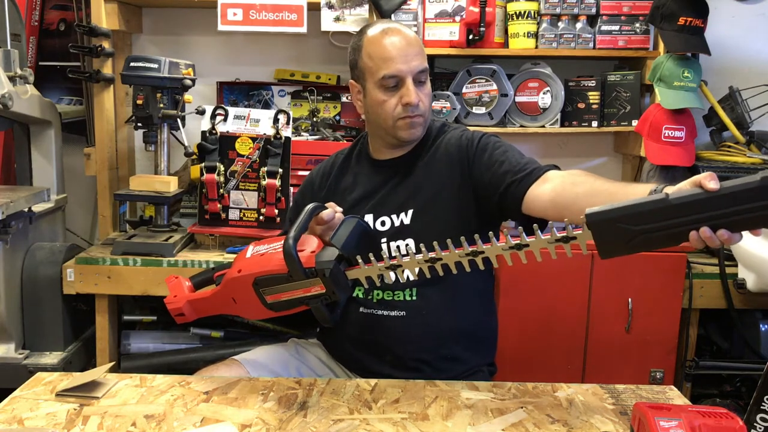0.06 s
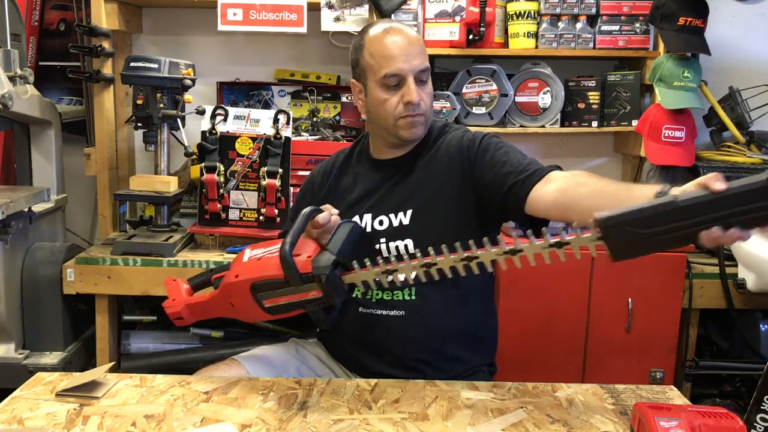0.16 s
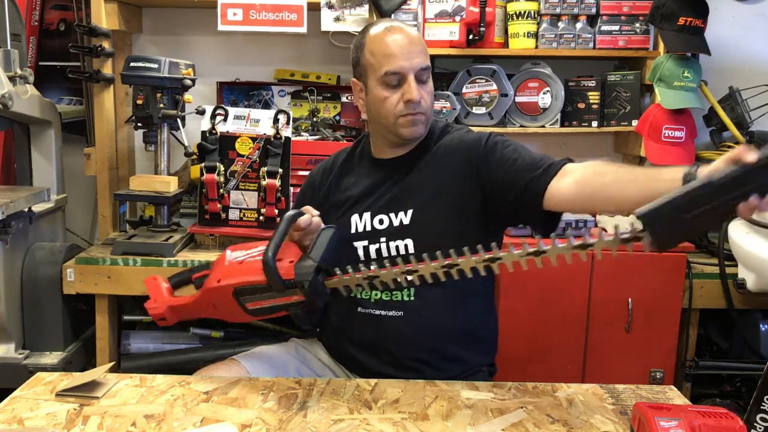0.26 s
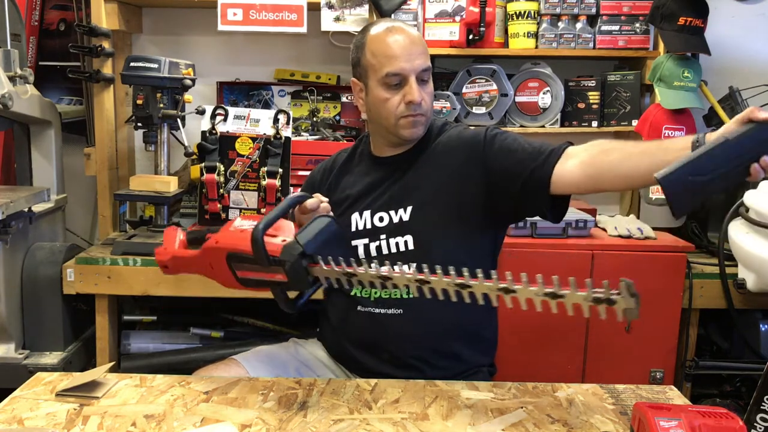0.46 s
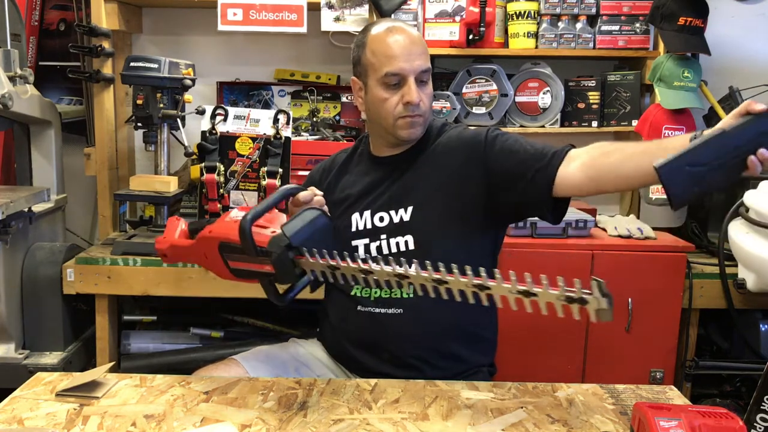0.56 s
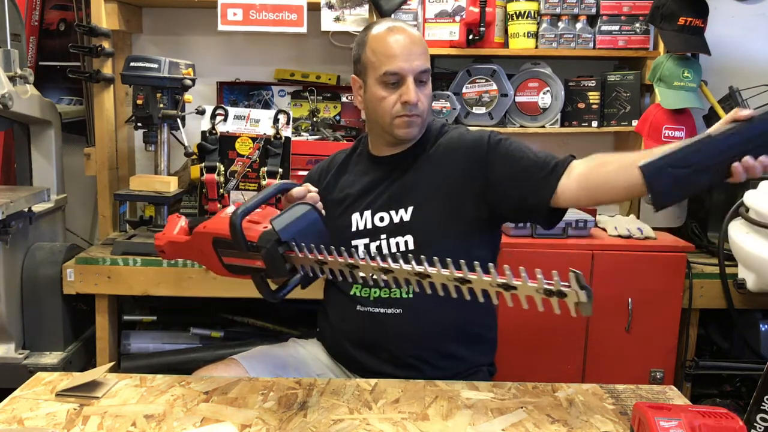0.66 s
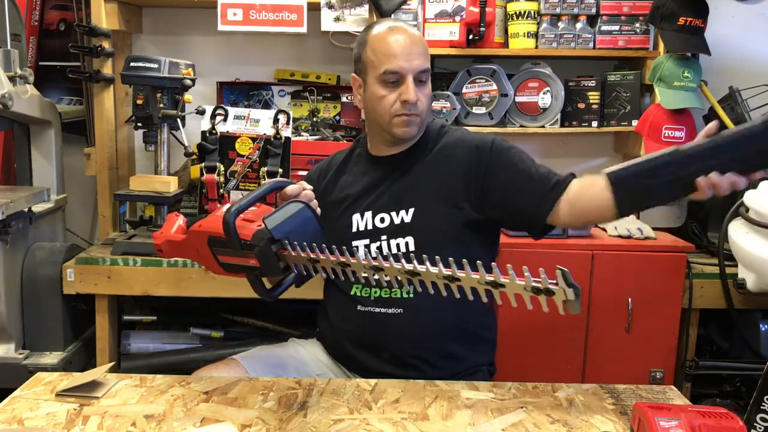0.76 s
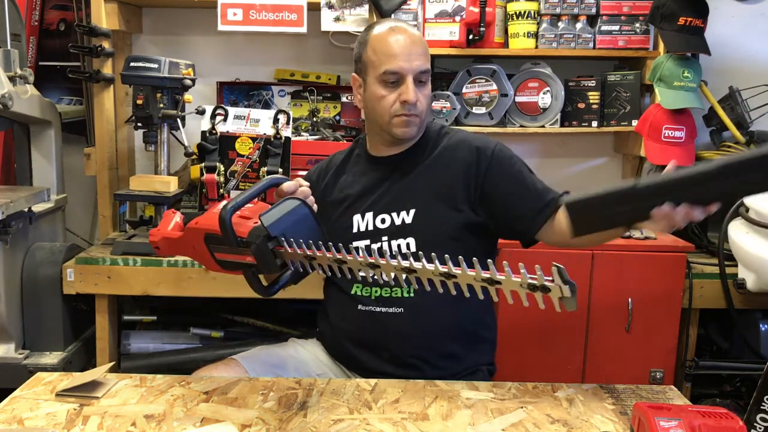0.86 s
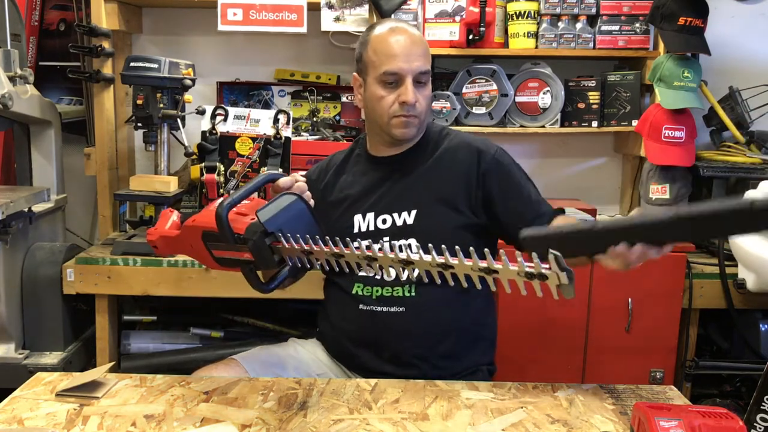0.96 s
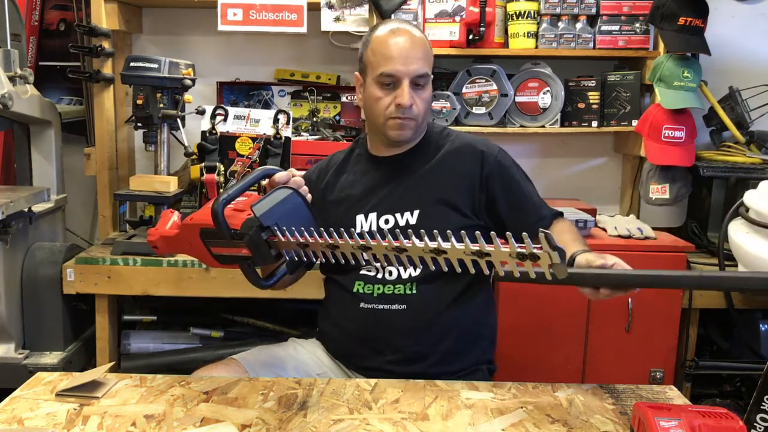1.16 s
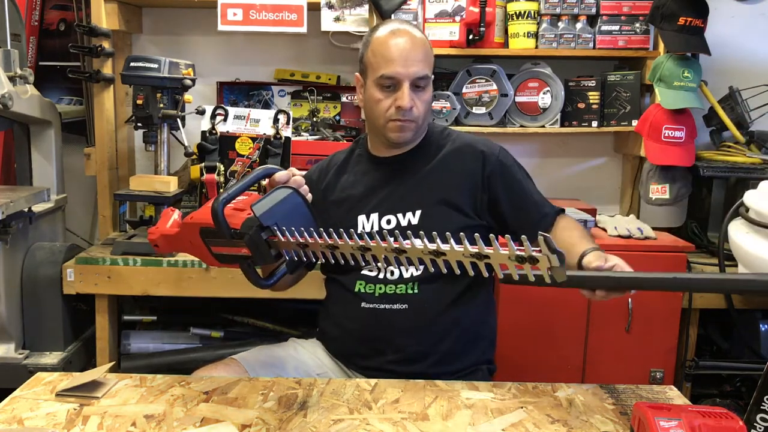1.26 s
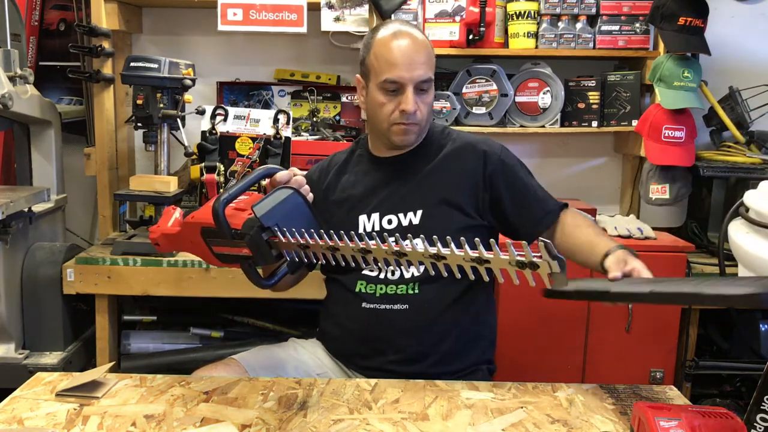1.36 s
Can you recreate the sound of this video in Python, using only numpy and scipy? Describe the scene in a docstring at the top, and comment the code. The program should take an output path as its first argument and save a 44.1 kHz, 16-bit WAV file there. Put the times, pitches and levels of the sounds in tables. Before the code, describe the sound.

A hard plastic sheath is pulled off a hedge trimmer's steel blade in a quick, rattling scrape. The blade hums faintly, then the sheath knocks once and clatters lightly onto a wooden bench, close by in a garage.

```python
"""A hard plastic sheath is pulled off a hedge trimmer's steel blade, close to one microphone in a garage.
It squeaks, scrapes and snags on the teeth, and each snag rings the hollow plastic and pushes the
blade, which hums on once it is free. The sheath then slips through the hand, knocks once, and drags
and clatters down onto a wooden bench. Behind it lie a short room tail and faint, steady air."""
import sys
import numpy as np
from scipy import signal
from scipy.fft import rfft, irfft
from scipy.io import wavfile

SR = 44100
rng = np.random.default_rng(int(sys.argv[2]) if len(sys.argv) > 2 else 0)


def wav_out(sig):
    """Save sig, one row per channel (or a flat mono array), as 16-bit PCM at SR to the path in sys.argv[1]."""
    wavfile.write(sys.argv[1], SR, np.round(np.clip(np.atleast_2d(sig).T, -1, 1) * 32767).astype(np.int16))


N = 61739

# teeth catching the sheath; levels are relative, here and in the tables below:
# (time [s], hollow body [dB], wall clack [dB], crack [dB], fine snap [dB], push on the blade [dB])
CATCHES = [(.1763, -87, -36.5, -27.5, -48, -23), (.1995, -27, -30, -16, -31, -4),
           (0.2053, -6, -9.5, -11, -23, -21), (0.2121, -8.5, -6, -21, -29, -21),
           (0.2166, -13, -7, -21.5, -26.5, -22.5), (0.2216, -9.5, -11, -16, -22.5, -15),
           (.2245, -10.5, -6, -7, -20, -16.5), (.2300, -13.5, -13, -9.5, -10.5, -17),
           (0.2346, -4, -14, -11, -26, -13), (.2415, -8, -13, -14, -19.5, -1.5),
           (.2510, -14, -12.5, -14, -32, -18), (.2661, -6.5, -7, -3.5, -2.5, 4),
           (0.2763, -9, -16.5, -10.5, -16, -21.5), (0.285, -7, -8.5, -8, -17, -24),
           (0.2877, -8, -7.5, -13, -19, -13), (0.2926, -1.5, -8.5, -10.5, -29.5, 1.5),
           (.3050, -16, -20, -18.5, -27.5, -25), (0.3179, -6.5, -28, -9, -22, -14.5),
           (.3240, -19.5, -15, -7.5, -23, -20), (.3280, -6.5, -28, -17, -33, -16.5),
           (.3310, -34, -26, -16.5, -34, -14), (0.342, -19, -12, -28, -35, -24)]
# modes of the hollow sheath: (frequency [Hz], level [dB], t60 [s])
SHEATH_MODES = [(260, -9.5, 0.097), (348, -10.5, 0.15), (402.4, -7.5, 0.1), (443, -3, 0.2),
                (504, 1.5, 0.11), (553, 1.5, 0.099), (745, -7.5, 0.096), (764.6, -10, 0.091),
                (865, -14.5, 0.02), (1009, -8, 0.053), (1030, -15.5, 0.032), (1070, -15, 0.033),
                (1290, -10, 0.058), (1578, -12, 0.16), (1916, -16, 0.077)]
# modes of its flat walls: (frequency [Hz], level [dB], t60 [s])
WALL_MODES = [(722, 0, .07), (800, -4, .05), (970, 2.5, 0.076), (1068, -6, 0.044), (1119, -4.5, 0.044),
              (1231, -3.5, .05)]
# modes of the steel teeth, deadened by the plastic: (frequency [Hz], level [dB], t60 [s])
TEETH_MODES = [(1650, -3, .045), (1900, -5, 0.035), (2200, -5.5, .045), (2428, -3.5, 0.061),
               (3197, 3.5, 0.027), (4640, 0, 0.026), (5155, 0, 0.056), (5700, -2, 0.09), (7290, 1, 0.02)]
# crack of hard plastic: (frequency [Hz], level [dB])
CRACK_SPECTRUM = [(40, -7), (190, -30.5), (400, -0.5), (1100, -1), (1430, -4.5), (1750, 4), (2600, -2.5),
                  (3250, -1.5), (3900, -1), (5200, -1.5), (6600, -16.5), (9000, -26.5), (12500, -30),
                  (16000, -50.5)]
# the fine, bright snap on top of it: (frequency [Hz], level [dB])
SNAP_SPECTRUM = [(100, -44), (3000, -12), (5500, 8), (7500, 2), (11000, -11.5), (14000, -16.5),
                 (16000, -18.5)]


def snagging():
    """Close to the microphone, tooth after tooth catches the sheath and rings plastic and steel."""
    times, body_db, clack_db, crack_db, snap_db, _ = np.transpose(CATCHES)
    crack_force = contacts(times, crack_db, chatter_share=1, chatter_s=0.0052)
    body = through(contacts(times, body_db, chatter_share=0.088), ring(SHEATH_MODES))
    cracks = through(crack_force, colour(CRACK_SPECTRUM))
    teeth = amp(-8) * through(crack_force, ring(TEETH_MODES))
    snaps = through(contacts(times, snap_db, chatter_share=1, chatter_s=0.0013), colour(SNAP_SPECTRUM))
    walls = amp(-2.5) * through(contacts(times, clack_db, chatter_share=0.3), ring(WALL_MODES))
    return amp(2.5) * (body + cracks + teeth + snaps + walls)


# sliding pressure on the blade: (time [s], level [dB])
SLIDE_LEVEL = [(0, -73), (.035, -71.5), (.068, -59.5), (.105, -74), (.135, -62), (.155, -63.5),
               (.18, -50.5), (.195, -45), (.206, -31.5), (.235, -30), (.258, -34), (.29, -29), (.31, -36.5),
               (.33, -39), (.35, -41), (.38, -82)]
# plastic scraping on steel: (frequency [Hz], level [dB])
SCRAPE_SPECTRUM = [(40, -6.5), (110, -2.5), (190, -18), (350, 5.5), (500, 0.5), (640, -22), (740, 2),
                   (850, -1), (1020, -1.5), (1250, -3.5), (1430, -7), (1800, -3.5), (3800, -8),
                   (5300, -6.5), (7000, -14.5), (11500, -22), (16000, -43.5)]
# plastic squeaking on steel: (time [s], level [dB])
SQUEAK_LEVEL = [(.03, -80.5), (.06, -68.5), (.095, -85), (.118, -69), (.135, -52), (.15, -66.5),
                (.17, -79.5)]


def scraping(squeak_hz=1050, squeak_t60_s=0.075):
    """Tiny slips along the blade rasp, ring the hollow sheath and excite one squeaking mode."""
    grain = friction(slips_per_s=3500, spread_db=3.5)
    slips = grain * level(SLIDE_LEVEL)
    rasp = through(slips, colour(SCRAPE_SPECTRUM))
    body = amp(-1) * through(slips, ring(SHEATH_MODES))
    squeak = through(grain * level(SQUEAK_LEVEL), ring([(squeak_hz, 0, squeak_t60_s)]))
    return rasp + body + squeak


# modes of the steel blade: (frequency [Hz], level [dB], t60 [s], gain while sheathed [0-1])
BLADE_MODES = [(103.7, -31.5, 0.81, 1), (445.7, -29.5, 0.28, 0.091), (481.8, -28, 0.2, .1),
               (730, -58.5, 0.28, 0.3), (987, -59, 0.38, 0.24), (1308, -50.5, 0.44, .3),
               (1590, -54.5, .28, .3)]


def blade_hum(flex_s=0.019, freed_at_s=0.37, freeing_s=0.13):
    """Every snag slowly flexes the blade and feeds its modes, which ring out once it is free."""
    t = np.arange(N) / SR
    pushes, hum = np.zeros(N), np.zeros(N)
    flex = unit(np.hanning(round(flex_s * SR)))
    for s, *_, push_db in CATCHES:
        add(pushes, s - flex_s / 2, (amp(push_db) * flex) ** 2)
    pushes[0] += amp(-24) ** 2  # the blade is already humming faintly
    freedom = np.clip(1 + (t - freed_at_s) / freeing_s, 0, 1)
    for hz, db, t60, sheathed in BLADE_MODES:
        energy_kept = amp(-120 / (t60 * SR))  # per sample
        energy = signal.lfilter([1], [1, -energy_kept], pushes)
        exposure = sheathed + (1 - sheathed) * freedom
        hum += amp(db) * exposure * np.sqrt(2 * energy) * np.sin(2 * np.pi * hz * t)
    return hum


# the sheath's knocks against hand and bench, with two quick echoes of the loudest:
# (time [s], hollow tock [dB], clack [dB], crack [dB])
KNOCKS = [(0.725, -61, -29, -41), (.7310, -66, -32.5, -34), (.7760, -52, -52, -31),
          (0.9568, -11.5, -21.5, -42), (0.963, -13.5, -25, -54), (0.9734, -18, -34.5, -63),
          (0.9867, -32.5, -33, -63), (1.3645, -25, -42, -48), (1.381, -31, -22.5, -30),
          (1.3842, -35, -26, -39), (1.3902, -28, -25.5, -37), (1.3950, -34, -22, -32)]
# modes of the sheath's end striking wood: (frequency [Hz], level [dB], t60 [s])
TOCK_MODES = [(289, -9, 0.062), (415, -2.5, 0.13), (527, 8, 0.039), (740, -2.5, 0.076), (988, -18, 0.056),
              (1271, -15, 0.18), (1570, -24, 0.34), (1630, -15, .03), (1883, -34, 0.019), (5230, -11, .028)]
# dull clack of the sheath: (frequency [Hz], level [dB])
CLACK_SPECTRUM = [(60, -36), (200, -44), (520, -4), (760, 0), (900, -4), (1250, -1), (1900, -14),
                  (2500, -18.5), (5300, -24.5), (14000, -47)]


def knocking():
    """The empty sheath knocks as it is lowered and set down on the bench near the microphone."""
    times, tock_db, clack_db, crack_db = np.transpose(KNOCKS)
    tocks = through(contacts(times, tock_db, chatter_share=0.013), ring(TOCK_MODES))
    clacks = through(contacts(times, clack_db, chatter_share=0.8), colour(CLACK_SPECTRUM))
    cracks = through(contacts(times, crack_db, chatter_share=0.99), colour(CRACK_SPECTRUM))
    return amp(1) * (tocks + clacks + cracks)


# the hand rubbing along the sheath: (time [s], level [dB])
RUB_LEVEL = [(.70, -79), (.758, -68), (.775, -52.5), (.81, -59.5), (.865, -60), (.905, -56), (.95, -63.5),
             (1.0, -63), (1.05, -62), (1.10, -74.5), (1.16, -85.5), (1.21, -75), (1.28, -88), (1.32, -67.5),
             (1.35, -58.5), (1.4, -66)]
# skin on plastic: (frequency [Hz], level [dB])
SKIN_SPECTRUM = [(60, -37), (200, 4), (480, -3.5), (660, -8), (800, -6.5), (1800, -3), (3500, -3),
                 (5500, -2.5), (7500, -9.5), (12000, -15), (16000, -27)]


def rubbing():
    """The sheath slips through the hand: a soft, close hiss that also rings its hollow body."""
    slips = friction(slips_per_s=9000, spread_db=3) * level(RUB_LEVEL)
    return through(slips, colour(SKIN_SPECTRUM)) + amp(-1.5) * through(slips, ring(SHEATH_MODES))


# the sheath's end dragging over the bench: (time [s], level [dB])
DRAG_LEVEL = [(1.29, -91.5), (1.318, -62), (1.329, -49), (1.345, -57), (1.37, -55.5), (1.4, -46.5)]
# plastic on wood: (frequency [Hz], level [dB])
BENCH_SPECTRUM = [(60, -24.5), (280, -7), (400, -2), (540, -1), (650, -2), (770, 13.5), (900, -14),
                  (1020, 0), (1220, -2), (1600, -22), (3000, -22.5), (12000, -43)]


def dragging():
    """At the bench, the sheath's end slides briefly over the wood in tiny slips."""
    slips = friction(slips_per_s=9000, spread_db=3) * level(DRAG_LEVEL)
    return through(slips, colour(BENCH_SPECTRUM))


# decay of the garage: (frequency [Hz], t60 [s])
GARAGE_T60 = [(100, 0.1), (500, 0.39), (1500, .42), (5000, 0.44), (9000, 0.38), (15000, 0.35)]


def garage(direct, wet_db):
    """The direct sound reaches the microphone first, then a diffuse tail dying band by band."""
    t = np.arange(SR // 2) / SR
    reflections = rng.standard_normal(len(t)) * np.clip((t - 0.003) / 0.0035, 0, 1)
    hz, s, bands = signal.stft(reflections, SR, nperseg=256)
    decay = amp(-60 * s / read(GARAGE_T60, hz)[:, None])
    tail = signal.istft(bands * decay, SR, nperseg=256)[1]
    return direct + amp(wet_db) * through(direct, unit(tail))


# room tone of the garage: (frequency [Hz], level [dB])
AIR_SPECTRUM = [(12, -37), (20, -1), (86, -2), (182, -10.5), (446, -15), (849, -22.5), (949, -23.5),
                (1220, -25), (5850, -35), (14700, -39.5), (16000, -39)]


def air(rms_db=-62):
    """Faint, steady, low noise all around the microphone."""
    gain = amp(read(AIR_SPECTRUM, np.fft.rfftfreq(N, 1 / SR)))
    noise = irfft(rfft(rng.standard_normal(N)) * gain, N)
    return amp(rms_db) * unit(noise) * np.sqrt(N)


def contacts(times, dbs, chatter_share, chatter_s=0.0073, size=2048):
    """Force of contacts, each one's energy split between a sharp click and a dying chatter."""
    force, t = np.zeros(N), np.arange(size) / SR
    for s, db in zip(times, dbs):
        blow = np.sqrt(chatter_share) * unit(rng.standard_normal(size) * np.exp(-t / chatter_s))
        blow[0] -= np.sqrt(1 - chatter_share)  # the click
        add(force, s, amp(db) * blow)
    return force


def friction(slips_per_s, spread_db):
    """Random tiny slips of uneven size, rms 1."""
    sizes = amp(spread_db * np.minimum(rng.exponential(1, N), 4)) * rng.choice([-1, 1], N)
    slipping = rng.random(N) < slips_per_s / SR
    return unit(sizes * slipping) * np.sqrt(N)


def ring(modes, bass_cut_hz=286):
    """The dying modes of a struck object, with the bass filtered out."""
    t = np.arange(SR // 3) / SR
    ringing = sum(amp(db - 60 * t / t60) * np.sin(2 * np.pi * hz * t) for hz, db, t60 in modes)
    return unit(signal.sosfilt(signal.butter(4, bass_cut_hz, "high", fs=SR, output="sos"), ringing))


def colour(spectrum, size=4096):
    """Causal impulse response with the given spectral shape."""
    log_gain = np.log(amp(read(spectrum, abs(np.fft.fftfreq(size, 1 / SR)))))
    minimum_phase = np.exp(np.conj(signal.hilbert(log_gain)))
    return unit(np.fft.ifft(minimum_phase).real[:size // 2])


def amp(db):
    """Decibels to gain."""
    return 10 ** (np.asarray(db) / 20)


def read(points, hz):
    """Interpolates a table on a log-frequency axis."""
    table_hz, values = np.transpose(points)
    return np.interp(np.log(hz + 1), np.log(table_hz + 1), values)


def level(points):
    """A level curve as gain per sample, silent outside its span."""
    s, db = np.transpose(points)
    return amp(np.interp(np.arange(N) / SR, s, db, left=-200, right=-200))


def unit(x):
    """Scales to energy 1."""
    return x / (np.linalg.norm(x) + 1e-20)


def add(mix, s, sound):
    """Mixes a sound in at a time."""
    part = mix[max(round(s * SR), 0):][:len(sound)]
    part += sound[:len(part)]


def through(x, response):
    """Passes a sound through an impulse response."""
    return signal.fftconvolve(x, response)[:N]


def scene():
    """One microphone, close enough that the direct sound stands well above the garage's tail."""
    pull = garage(snagging() + scraping(), wet_db=-10)
    handling = garage(rubbing() + dragging(), wet_db=-10)
    knocks = garage(knocking(), wet_db=-10.5)
    return (pull + blade_hum() + handling + knocks + air())[None]


def record(dry):
    """The recorder passes the microphone's signal up to 15.9 kHz."""
    lowpass = signal.firwin(401, 15900, window=("kaiser", 9), fs=SR)
    return signal.oaconvolve(dry, lowpass[None], "same")


dry = scene()
out = record(dry)
wav_out(out)
```